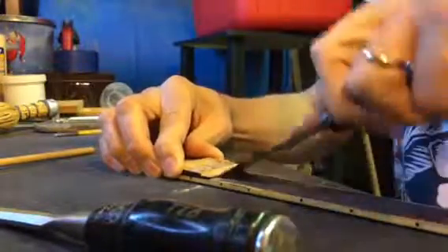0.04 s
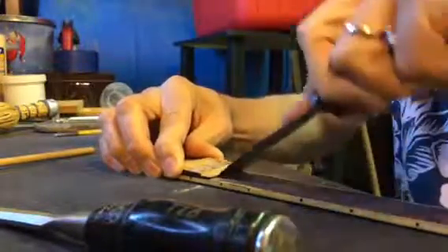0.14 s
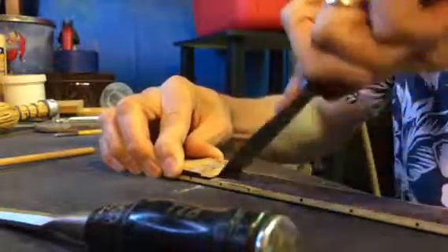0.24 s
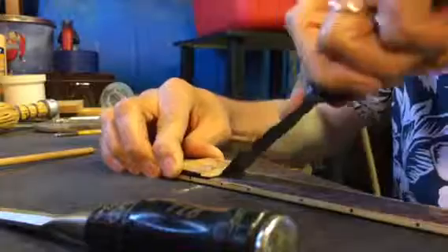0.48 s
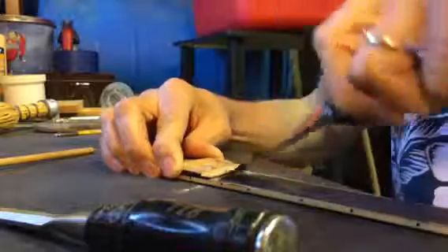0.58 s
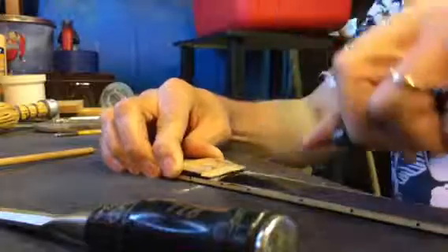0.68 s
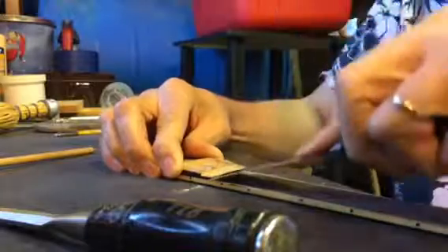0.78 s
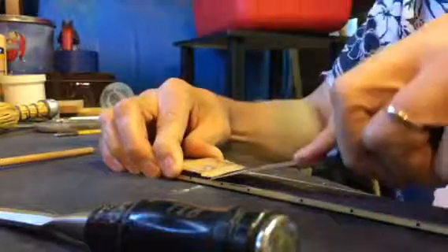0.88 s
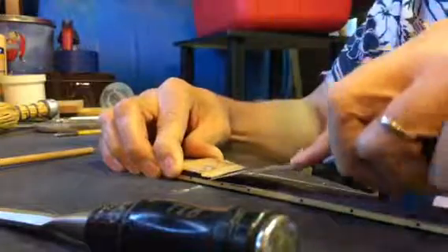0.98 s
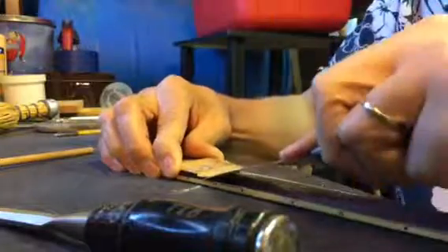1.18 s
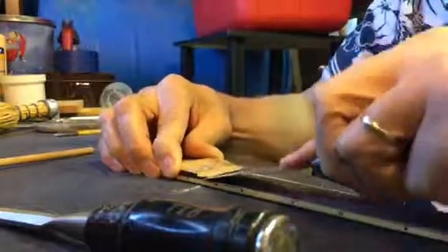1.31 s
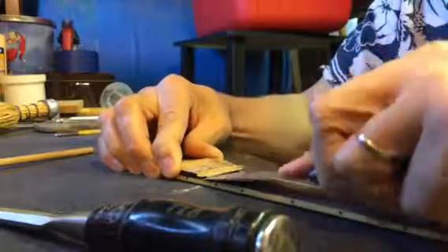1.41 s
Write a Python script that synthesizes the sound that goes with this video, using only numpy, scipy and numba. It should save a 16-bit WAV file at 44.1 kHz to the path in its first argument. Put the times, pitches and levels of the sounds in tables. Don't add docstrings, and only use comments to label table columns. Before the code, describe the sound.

Wood fibres snap loudly under a thin blade, followed by quiet gritty rubbing and small bumps

```python
import sys
import numpy as np
from scipy import signal
from scipy.fft import rfft, irfft, next_fast_len
from scipy.io import wavfile
from scipy.ndimage import uniform_filter1d
from numba import njit

SR = 44100
rng = np.random.default_rng(int(sys.argv[2]) if len(sys.argv) > 2 else 0)


def to_wav(s):
    ch = np.atleast_2d(s).T
    pcm = np.round(np.clip(ch, -1, 1) * 32767)
    wavfile.write(sys.argv[1], SR, pcm.astype(np.int16))


def nominal_scale(level):
    x = np.asarray(level, float) / 20
    return 10 ** x


N = 63945


def level(x, db):
    return x * nominal_scale(db) / np.sqrt(np.mean(x ** 2))


def band(x, hz, width_hz):
    b, a = signal.iirpeak(min(hz, .42 * SR), hz / width_hz, fs=SR)
    return signal.lfilter(b, a, x)


@njit
def sweep(x, hz, width_hz):
    y, b, l = np.empty(len(x)), 0., 0.
    for i in range(len(x)):
        g, k = np.tan(np.pi * hz[i] / SR), width_hz / hz[i]
        v = (b + g * (x[i] - l)) / (1 + g * (g + k))
        b, l, y[i] = 2 * v - b, l + 2 * g * v, k * v
    return y


def decay(t_s, t60_s):
    return np.exp(-np.log(1000) * t_s / t60_s)


def ring(x, modes):
    out = 0
    for k, (hz, db, t60_s) in enumerate(modes):
        pole = np.exp(2j * np.pi * hz / SR - np.log(1000) / (t60_s * SR))
        gain = (-1) ** k * nominal_scale(db) * np.sqrt(1 - abs(pole) ** 2)
        out = out + gain * signal.lfilter([1], [1, -pole], x).imag
    return out


def colour(x, points):
    hz, db = np.array(points, float).T
    n = next_fast_len(len(x))
    f = np.arange(n // 2 + 1) * SR / n + 1
    gain = nominal_scale(np.interp(np.log(f), np.log(hz), db))
    return irfft(rfft(x, n) * gain, n)[:len(x)]


def walk(rate_hz):
    k = int(SR / rate_hz)
    steps = np.repeat(rng.standard_normal(N // k + 1), k)
    return 1.3 * uniform_filter1d(uniform_filter1d(steps, k), k)[:N]


def grit():
    grain_db, chatter_db = 3, 1.5
    return rng.standard_normal(N) * nominal_scale(grain_db * rng.exponential(size=N) + chatter_db * walk(180))


# [f/Hz, density/dB]
SHOP_NOISE = [(19, -35), (32, -6.5), (137, -9), (369, -20.5), (420, -25), (847, -31.5), (1020, -32),
              (1100, -33.5), (16000, -46)]


def shop():
    base, out = colour(rng.standard_normal(N), SHOP_NOISE), 0
    for hz in 30 * 2 ** np.arange(0, 9.5):
        out = out + band(base, hz, .7 * hz) * nominal_scale(walk(6))
    return level(out, -65)


# [f/Hz, level/dB rms]
MAINS = [(120, -80), (181, -78), (361, -81.5), (841, -84.5)]


def hum():
    t, out = np.arange(N) / SR, 0
    for hz, db in MAINS:
        waver = nominal_scale(db + 1.4 * walk(14))
        out = out + waver * np.sqrt(2) * np.sin(2 * np.pi * (hz * t + rng.random()))
    return out


# [t/s, level/dB, rustle/dB]
LEAN_PATH = [(0, -86.5, 1), (0.122, -69.5, 4), (0.198, -79, 11), (0.36, -73.5, 11), (.47, -72, 4),
             (.55, -90.5, 24.5), (.7, -67.5, -3.5), (0.771, -78, 0), (.83, -70.5, 9), (.88, -65, 8),
             (.92, -63, -3.5), (.96, -58.5, -13), (1.098, -62.5, -14.5), (1.201, -60, -10.5),
             (1.27, -56, -12.5), (1.33, -61.5, -8), (1.391, -52.5, -12.5), (1.45, -58.5, -15)]
# [f/Hz, level/dB, t60/s]
BOOM_MODES = [(110.5, 4.5, 0.083), (185, -1, 0.18)]
# [f/Hz, level/dB, t60/s]
CREAK_MODES = [(254.2, 0, .12), (348, -6, 0.059), (460.8, -5, 0.0713)]


def lean():
    t_s, lean_db, rustle_db = np.array(LEAN_PATH, float).T
    t = np.arange(N) / SR
    grains = grit()
    cloth = level(band(band(grains, 750., 790.), 750., 750.), -6)
    creak = level(ring(grains, CREAK_MODES), -3.5)
    boom = level(ring(rng.standard_normal(N), BOOM_MODES), -1.5)
    rustle = nominal_scale(np.interp(t, t_s, rustle_db)) * (cloth + creak)
    return nominal_scale(np.interp(t, t_s, lean_db)) * (boom + rustle)


# [f/Hz, level/dB, t60/s]
BENCH_MODES = [(158.6, -15, 0.063), (240, -9, 0.03), (370, -7, 0.02), (500, -5.5, 0.015), (720, 1, .015),
               (950, 4, .012), (1350, 7, .01), (1650, 14, 0.014), (2200, 10, 0.014)]


def bursts(rows, modes, knock_db):
    size = 600
    crack, push, knock = np.zeros((3, N))
    u = np.arange(size) / SR
    high_pass = signal.butter(2, 3200, "high", fs=SR)
    for s, db, ms, hz, ring_db in rows:
        z = rng.standard_normal(size)
        i, length = int(s * SR), ms * SR / 1000
        shape = np.clip(u / 0.00019, 0, 1) / (1 + (u / (ms / 1000)) ** 5)
        swarm = band(band(np.tanh(z) * shape, hz, 1.4 * hz), hz, 1.4 * hz)
        swarm = signal.lfilter(*high_pass, swarm)
        swarm = swarm * nominal_scale(db) / np.sqrt(np.sum(swarm ** 2) / length)
        crack[i:i + size] += swarm
        push[i:i + size] += .15 * swarm * nominal_scale(ring_db)
        push[i + 8] += nominal_scale(db + ring_db - 2) * np.sqrt(length)
        knock[i:i + size] += nominal_scale(db + knock_db) * shape * (1 + 0.32 * z)
    return np.array([crack + ring(knock, BENCH_MODES), ring(push, modes)])


# [t/s, level/dB, burst/ms, brightness/Hz, ring/dB]
SNAP_EVENTS = [(.0288, -59, 3, 5300, -30), (.135, -70, 1, 4000, -20), (.1754, -33, 1.2, 10000, 1),
               (.1865, -54, 1, 8800, -15), (.2372, -52, 1, 11000, -12), (.2429, -38, 1.4, 5000, -14),
               (.2489, -20, 1.3, 8000, -5), (.2511, -21, 1.5, 9000, -5), (.2552, -14, 1.0, 10000, 1),
               (.2570, -25, 1.3, 8000, -10), (.259, -17, 0.8, 9000, -3), (.2602, -23, 1.1, 8000, -10),
               (.266, -35, 1, 8500, -10), (.2705, -39, 1, 8000, -10), (.3446, -51, 2, 9000, -25),
               (.2262, -66, 1, 11000, -20), (.2325, -62, 1, 12000, -20)]
# [f/Hz, level/dB, t60/s]
STRIP_MODES = [(3200, -12, .006), (4425, -8, .028), (4740, -8, .008), (6250, -5, .008), (8000, 1, .011),
               (10150, -4, .012), (12150, 2, .006), (12730, -3, .022), (14050, -10, .008),
               (15400, -8, .008)]


def snaps():
    return bursts(SNAP_EVENTS, STRIP_MODES, knock_db=-25.5)


# [f/Hz, level/dB, t60/s]
TAIL_BANDS = [(300, -14, .3), (700, -7, .3), (1500, -8, .3), (2300, -3, .3), (4600, -12, .3),
              (6200, -6, .33), (8500, -15, .22), (12500, -17, .16)]


def room(x):
    early_db, early_t60_s, tail_db = -6, 0.048, -8.5
    u = np.arange(SR // 2) / SR

    def fade(t60_s):
        return decay(u, t60_s) / np.sqrt(t60_s * SR / 14)

    early = nominal_scale(early_db) * rng.standard_normal(len(u)) * fade(early_t60_s) * np.clip(u / 0.0058, 0, 1)
    tail = 0
    for hz, db, t60_s in TAIL_BANDS:
        tail = tail + nominal_scale(db) * band(rng.standard_normal(len(u)), hz, .5 * hz) * fade(t60_s)
    tail = nominal_scale(tail_db) * tail * np.clip(u / 0.004, 0, 1)
    return signal.fftconvolve(x, early + tail)[:N]


# [t/s, level/dB, f/Hz, t60/s]
BUMP_EVENTS = [(.812, -62, 249, 0.058), (0.823, -73, 1160, 0.042), (.832, -56, 241, 0.059),
               (.834, -71, 2190, 0.046), (.843, -60, 274, 0.033), (.853, -58, 250, 0.032),
               (.866, -62, 910, 0.011), (.867, -65.5, 2100, 0.023), (0.868, -53, 417, 0.026),
               (.872, -70, 1160, 0.049), (.883, -55, 1110, 0.02), (.886, -54, 520, 0.035),
               (0.889, -66, 2200, 0.044), (.891, -58, 1000, .015), (0.893, -65.5, 1614, 0.041),
               (.897, -56.5, 430, 0.035), (0.276, -44, 282, 0.044), (.277, -63, 2170, 0.038),
               (.343, -56, 282, 0.044)]


def bumps():
    out, u = np.zeros(N), np.arange(SR // 10) / SR
    for s, db, hz, t60_s in BUMP_EVENTS:
        i = int(s * SR)
        swing = np.sqrt(2) * np.sin(2 * np.pi * hz * u) * decay(u, t60_s)
        out[i:i + len(u)] += nominal_scale(db) * swing * np.clip(u * hz, 0, 1)
    return out


# [t/s, level/dB, steel share/dB]
SLIDE_PATH = [(0.358, -69, -27), (.58, -67, -8), (0.628, -65.5, 4.5), (.70, -65, 9.5), (.728, -65, 4),
              (0.747, -84, -1), (0.809, -80.5, -5), (.87, -76, 9), (.905, -73.5, -10), (.925, -74, 5),
              (.962, -74, 5), (.972, -90, 0), (1.144, -81, -28), (1.164, -62.5, -6.5), (1.235, -61.5, -19),
              (1.284, -56.5, -23), (1.324, -75, -25), (1.45, -82, -4)]
# [t/s, pitch ratio of lowest bright mode]
BEND_PATH = [
    (.6, .99),
    (.66, 1.01),
    (.73, 1.1),
    (.8, 1.0),
    (.92, 1.0),
    (.97, 1.07),
]
# [f/Hz, width/Hz, level/dB]
SQUEAK_MODES = [(3950, 300, 2), (850, 130, -6), (1620, 130, -8), (6850, 500, -7), (9400, 220, -5),
                (11750, 450, -9), (14100, 450, -15)]
# [f/Hz, density/dB]
WOOD_SPECTRUM = [(240, -17.5), (400, -4.5), (1060, -10), (1160, -6.5), (1760, -7.5), (3370, -4.5),
                 (12100, -14.5), (16000, -18.5)]
# [f/Hz, density/dB]
STEEL_SPECTRUM = [(400, 2.5), (2000, -6.5), (4000, -21), (5000, -9), (7000, -1), (12500, -5.5),
                  (16000, -21)]


def slide():
    t_s, slide_db, steel_db = np.array(SLIDE_PATH, float).T
    t = np.arange(N) / SR
    bend = np.interp(t, *np.array(BEND_PATH).T)
    push, squeak = grit(), 0
    for k, (hz, width_hz, db) in enumerate(SQUEAK_MODES):
        patch = nominal_scale((3.5 if k else 1.2) * walk(50))
        drift = 1 + .004 * walk(30)
        mode = sweep(push, hz * (drift if k else bend), 1. * width_hz)
        squeak = squeak + nominal_scale(db) * patch * level(mode, 0)
    steel = level(squeak, -3) + level(colour(grit(), STEEL_SPECTRUM), -5)
    wood = level(colour(grit(), WOOD_SPECTRUM), -1)
    steel = steel * nominal_scale(np.interp(t, t_s, steel_db, left=-90))
    return nominal_scale(np.interp(t, t_s, slide_db, left=-90)) * (wood + steel)


# [t/s, length/s, from f/Hz, to f/Hz, level/dB]
SING_EVENTS = [
    (.628, .026, 9400, 9450, -68),
    (.716, .048, 9380, 9400, -72),
    (.615, .05, 830, 850, -72),
    (.675, .055, 860, 900, -69),
    (.615, .04, 1620, 1620, -72),
    (.922, .055, 3900, 4250, -69),
    (.92, .025, 11800, 11800, -75),
]


def sings():
    out, t, push = 0, np.arange(N) / SR, grit()
    for s, length_s, hz0, hz1, db in SING_EVENTS:
        u = np.clip((t - s) / length_s, 0, 1)
        tone = sweep(push, hz0 + (hz1 - hz0) * u, max(hz0 / 45, 60.))
        swell = np.sqrt(np.sin(np.pi * u).clip(0))
        out = out + level(tone, db) * swell
    return out


# [t/s, level/dB, burst/ms, brightness/Hz, ring/dB]
TICK_EVENTS = [(.632, -68, 1, 9400, 6), (.642, -66, 1, 9400, 4), (.697, -56, 2.5, 7000, -14),
               (.732, -72, 1, 9400, 8), (.8441, -57, 1.4, 10500, -14), (.858, -63, 1, 13000, -20),
               (.865, -65, 3, 11000, -20), (.8695, -63, 2, 9000, -10), (.875, -67, 2, 13000, -20),
               (.8835, -62, 2, 11000, -15), (.8877, -50, 1.3, 8000, 7), (.8932, -63, 1, 6000, -15),
               (.935, -63, 1, 5000, -8)]
# [f/Hz, level/dB, t60/s]
BLADE_MODES = [(3900, -3, .008), (6850, -10, .006), (9390, 0, .024), (11700, -3, .008), (13950, -6, .022)]


def ticks():
    return bursts(TICK_EVENTS, BLADE_MODES, knock_db=-20)


def scene():
    air = shop() + hum() + lean()
    dry, rings = snaps() + ticks()
    dry = dry + bumps() + slide() + sings()
    echoes = room(dry + nominal_scale(-14) * rings)
    return (dry + rings + echoes + air)[None]


def band_limit(x):
    return signal.sosfilt(signal.butter(12, 16880, fs=SR, output="sos"), x)


def record(dry):
    top_cut = signal.ellip(6, .3, 45, 15700, fs=SR, output="sos")
    mix = signal.sosfilt(top_cut, np.tanh(dry))
    return band_limit(mix)


dry = scene()
out = record(dry)
to_wav(out)
```